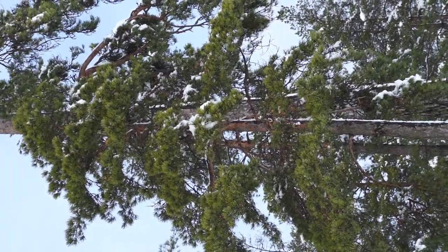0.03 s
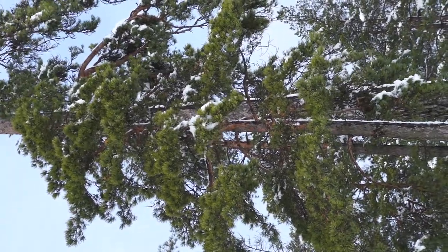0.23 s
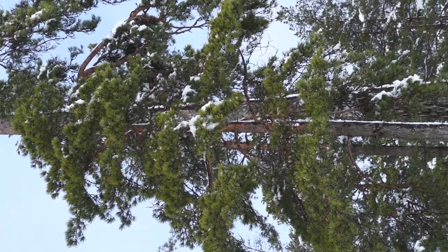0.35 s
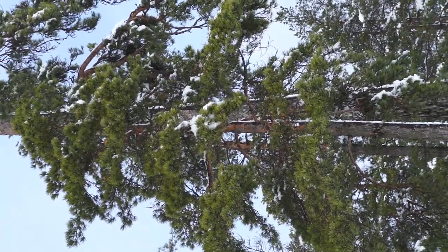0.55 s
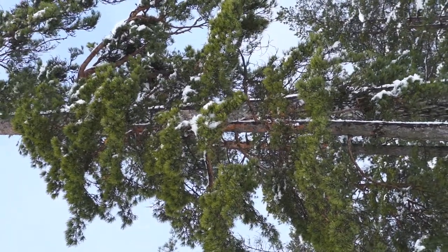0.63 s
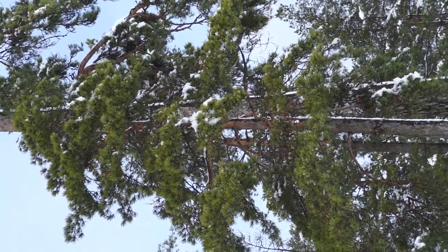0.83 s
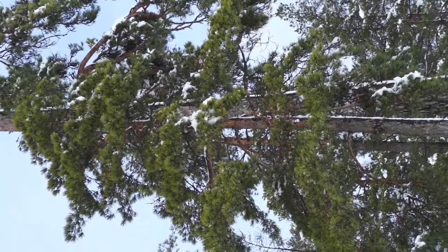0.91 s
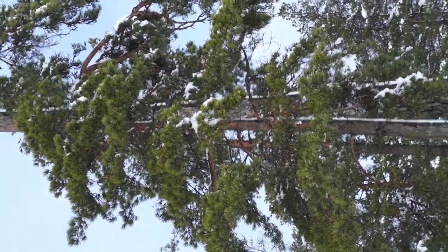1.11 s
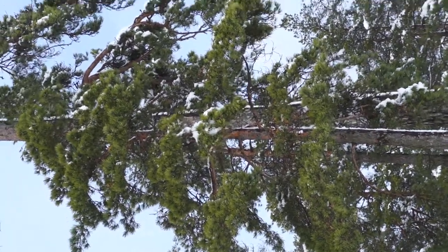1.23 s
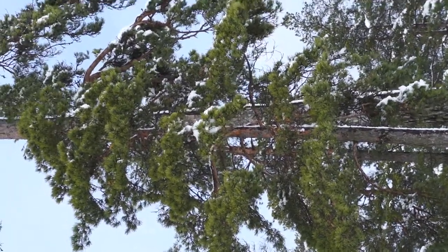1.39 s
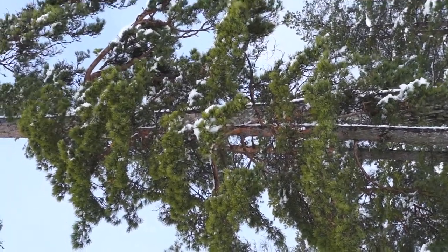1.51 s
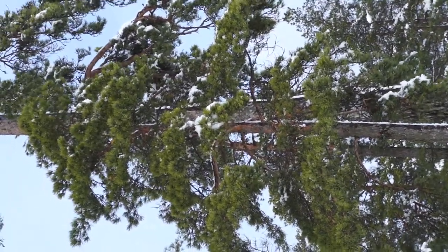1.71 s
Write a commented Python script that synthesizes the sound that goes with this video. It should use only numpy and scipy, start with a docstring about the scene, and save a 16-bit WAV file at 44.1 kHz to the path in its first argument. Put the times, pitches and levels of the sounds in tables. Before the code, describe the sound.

Wet snow falls from pine branches close by in a quick cluster of dull thuds, then a second cluster and scattered softer ones. Faint drips and a light rustle sound over the distant hush of a still wood.

```python
"""Thaw in a still pine wood

Wet snow gives way close by in clusters of dull thuds, with a low scuffing between them.
Drops and ice crumbs tick faintly and loose snow rustles now and then,
over a soft far-off wash and a thin steady whine."""
import sys
import numpy as np
from scipy import signal
from scipy.fft import rfft, irfft
from scipy.io import wavfile

SR = 44100
rng = np.random.default_rng(int(sys.argv[2]) if len(sys.argv) > 2 else 0)


def dump(signal):
    """Clip the signal to [-1, 1] and save it as 16-bit WAV at the path in sys.argv[1]."""
    limited = np.clip(np.atleast_2d(signal).T, -1, 1)
    pcm = np.round(limited * 32767).astype(np.int16)
    wavfile.write(sys.argv[1], SR, pcm)


N = 77175


def amp(db):
    """Decibels to gain."""
    return 10 ** (np.asarray(db) / 20)


def unit(x):
    """Scale to rms 1."""
    return x / np.sqrt(np.mean(x ** 2) + 1e-20)


def read(points, hz):
    """Interpolate a table on a log-frequency axis."""
    f, value = np.transpose(points)
    return np.interp(np.log(hz + 1), np.log(f + 1), value)


def curve(points):
    """Interpolate each column of a time table per sample."""
    times_s, *columns = np.transpose(points)
    return [np.interp(np.arange(N) / SR, times_s, column) for column in columns]


def pan(db):
    """Left and right gains for a level difference."""
    return amp(np.array([db, -db]).reshape(2, -1) / 2)


def colour(x, points):
    """Filter by a spectrum table, keeping the power of white noise."""
    size = x.shape[-1]
    gain = unit(amp(read(points, np.fft.rfftfreq(size, 1 / SR))))
    return irfft(rfft(x) * gain, size)


def add(mix, start_s, sound):
    """Mix in a stereo sound at start_s."""
    part = mix[:, max(round(start_s * SR), 0):][:, :sound.shape[1]]
    part += sound[:, :part.shape[1]]


def push(turns, half_cycles):
    """Soft push and rebound of air, dying within about a cycle."""
    return -np.sin(2 * np.pi * turns) * np.exp(-(turns / half_cycles) ** 2)


def thuds(core_ratio=1.58, crumble_db=-16.5, crumble_decay_s=0.0054):
    """Wet snow gives way: each thud is a push of air with a harder core and crumbling around it."""
    # thuds: t/s, level/dB, f/Hz, hardness/dB
    events = [(0.245, -29, 266, -7), (0.249, -22.5, 227, -15), (0.2561, -18, 290, -11.5),
              (0.2642, -18, 220, -18), (0.27, -25.5, 419, -15), (0.2749, -15, 443, -7.5),
              (0.2796, -15, 310, -10), (0.2891, -21, 350, -6), (0.3013, -17.5, 340, -21),
              (0.3032, -17.5, 486, -16.5), (0.314, -27, 267, -8), (0.3177, -19, 426, -9.5),
              (0.3254, -17, 238, -6.5), (0.332, -22, 249, -10), (0.3369, -21.5, 212, -14),
              (0.3736, -36, 149, -17), (0.58, -35, 217, -9), (0.833, -29, 197, -9.5),
              (0.8506, -37.5, 160, -17), (0.896, -32, 260, -22), (0.9692, -36, 252, -17),
              (1.0117, -24, 297, -8.5), (1.0162, -24, 382, -8), (1.0235, -18.5, 262, -17),
              (1.052, -30.5, 352, -17), (1.059, -36, 282, -1), (1.2574, -37.5, 158, -5),
              (1.2787, -38, 188, -3), (1.3773, -40.5, 187, -2), (1.4009, -34.5, 180, -17),
              (1.4108, -32, 274, -17), (1.418, -21, 271, -25), (1.4628, -23.5, 244, -4),
              (1.4685, -32, 216, -10), (1.735, -38, 272, -6)]
    # crumbling spectrum: f/Hz, density/dB
    crumble_spectrum = [(25, -37), (60, -23), (115, -8.5), (200, -8), (330, 3.5), (520, 5), (850, -6.5),
                        (1400, -27), (1750, -26), (3000, -59.5)]
    t, pulses, crumble_power = np.arange(N) / SR, np.zeros(N), np.zeros(N)
    for centre_s, db, hz, hard_db in events:
        turns = (t - centre_s) * hz
        core = amp(hard_db) * push(turns * core_ratio, half_cycles=0.53)
        pulses += amp(db) * (push(turns, half_cycles=0.62) + core)
        crumble_power += amp(db + crumble_db) ** 2 * np.exp(-2 * abs(t - centre_s) / crumble_decay_s)
    return pulses + colour(np.sqrt(crumble_power) * rng.standard_normal(N), crumble_spectrum)


def scuffing(spread_db=-16):
    """Low scuffing of snow between the thuds, nearly alike on both sides."""
    # envelope: t/s, level/dB
    envelope = [(0, -41.5), (.08, -42.5), (.13, -46), (.19, -45.5), (.33, -38), (.42, -56.5), (.58, -50.5),
                (.69, -54), (.77, -54.5), (.9, -45), (.98, -48.5), (1.05, -38), (1.14, -56), (1.19, -49),
                (1.27, -51), (1.34, -60.5), (1.51, -46.5), (1.57, -71), (1.75, -52.5)]
    # spectrum: f/Hz, density/dB
    spectrum = [(25, -33), (60, -13), (115, -3.5), (180, -1.5), (330, -10), (520, -13), (850, -30.5),
                (1400, -58), (3000, -62.5)]
    rub = rng.standard_normal(N) + amp(spread_db) * rng.standard_normal((2, N))
    return colour(amp(curve(envelope)[0]) * rub, spectrum)


def off_centre(snow):
    """The snow lies to one side, so its sound reaches the left channel later."""
    # channel differences: f/Hz, left lag/s, left-right/dB
    side = [(61, 0.00053, -0.5), (201, 0.00057, .5), (390, 0.00041, 0.8), (664, 0.00035, 3.5),
            (1100, 0.00018, 3)]
    side, hz = np.array(side), np.fft.rfftfreq(N, 1 / SR)
    delay_s = np.array([[.5], [-.5]]) * read(side[:, :2], hz)
    balance = pan(read(side[:, ::2], hz))
    return irfft(rfft(snow) * balance * np.exp(-2j * np.pi * hz * delay_s), N)


def ticks(decay_s=0.0029, ring_half_width_hz=230):
    """Drops and ice crumbs: each a tiny broadband splash with one short ring."""
    # impacts: t/s, level/dB, ring f/Hz, ring boost/dB, left-right/dB
    impacts = [(0.033, -49, 6100, 32, 4), (0.039, -51, 6100, 30, 16), (0.146, -54, 7900, 7, -2),
               (.442, -53, 8500, 14, -5), (0.542, -56.5, 8800, 17, -11), (.778, -49, 5160, 11, 0),
               (0.79, -54, 3630, 14, 5), (.8003, -48, 5500, 8, 0), (0.8082, -46.5, 8130, 1, -1),
               (0.8203, -47, 5900, 4, 1), (0.829, -47, 3670, 5, 0), (0.8405, -47, 3540, 15, 10),
               (.883, -48.5, 4100, 4, 2), (0.8865, -48, 3270, 19, -8), (0.94, -51, 10200, 3, 11),
               (0.946, -55, 8500, 1, -4), (1.028, -53, 8400, 20, -11), (1.0965, -52, 9500, 20, 5),
               (1.1076, -48.5, 9700, 15, 10), (1.11, -51.5, 3090, 20, 5), (1.162, -53, 8200, 22, -12),
               (1.313, -47, 10340, 26, 10), (1.316, -45, 3240, 10, 19), (1.4104, -48, 7550, 23, -19),
               (1.4195, -59, 9000, 15, 2), (1.454, -47, 8950, 7, -8)]
    # splash spectrum: f/Hz, density/dB
    spectrum = [(400, -8.5), (1500, 5.5), (3500, 5), (7000, 4.5), (11000, -1.5)]
    out, t = np.zeros((2, N)), np.arange(1024) / SR
    hz = np.fft.rfftfreq(len(t), 1 / SR)
    for start_s, db, ring_hz, ring_db, pan_db in impacts:
        boost_db = ring_db / (1 + ((hz - ring_hz) / ring_half_width_hz) ** 2)
        noise = rng.standard_normal((2, len(t))) + 0.82 * rng.standard_normal(len(t))
        splash = unit(irfft(rfft(noise) * amp(read(spectrum, hz) + boost_db)))
        add(out, start_s, amp(db) * pan(pan_db) * splash * np.exp(-t / decay_s) / 2)
    return out


def rustle(grain_db=3):
    """Loose snow sliding: a fine, grainy hiss that swells and fades."""
    # envelope: t/s, level/dB, left-right/dB
    envelope = [(0, -71.5, -2.5), (.72, -73.5, 1), (.82, -65.5, 1), (.93, -65, -2), (1.02, -72.5, 0),
                (1.15, -68.5, 2.5), (1.26, -62.5, 1), (1.315, -56.5, -3), (1.345, -67, 1),
                (1.39, -66.5, -3), (1.412, -58.5, -5), (1.45, -61, -3), (1.49, -65.5, -1), (1.64, -65, 0),
                (1.71, -61, 2), (1.75, -64, -3)]
    # spectrum: f/Hz, density/dB
    spectrum = [(500, -20), (1800, 2.5), (3200, 0.5), (3650, 6), (4000, 0.5), (5800, -0.5), (7000, 2),
                (7350, 5), (7750, -0.5), (9500, -2.5), (10300, 1), (11000, -9.5)]
    db, pan_db = curve(envelope)
    grains = unit(rng.standard_normal((2, N)) * amp(grain_db * rng.standard_normal(N)))
    return amp(db) * pan(pan_db) * colour(grains, spectrum)


def wash(level_db=-54):
    """Far-off wash of the wood: smooth noise, partly shared by the two sides."""
    # spectrum: f/Hz, density/dB
    spectrum = [(20, -18), (60, -6.5), (130, -6.5), (350, -8), (580, -3.5), (660, -4.5), (730, 1.5),
                (820, -5.5), (930, -4.5), (1040, -3), (1160, 2.5), (1250, -5), (1380, -13.5), (1800, -15),
                (2000, -17.5), (2170, -15), (2700, -22.5), (4000, -26.5), (4700, -21.5), (5300, -27.5),
                (6400, -26), (6800, -15.5), (7250, -28), (8500, -25), (11000, -36.5)]
    # likeness of the sides: f/Hz, correlation/0-1
    correlation = [(60, 0.9), (270, 0.48), (560, 0.8), (1180, 0.73), (2500, 0.62), (5250, 0.61),
                   (11000, 0.21)]
    # balance: f/Hz, left-right/dB
    balance = [(100, 3.5), (400, 1), (1100, -3.5), (2000, -4), (3500, 0), (6200, 3), (11000, -2.5)]
    hz = np.fft.rfftfreq(N, 1 / SR)
    left, independent = rfft(rng.standard_normal((2, N)))
    shared = np.clip(read(correlation, hz), 0, 1)
    right = shared * left + np.sqrt(1 - shared ** 2) * independent
    pair = np.array([left, right]) * pan(read(balance, hz))
    return amp(level_db) * colour(irfft(pair, N), spectrum)


def whine(waver_db=3.8, waver_corner_hz=3):
    """Two faint high tones of steady pitch that swell, fade and waver in level."""
    # tones: f/Hz, base level/dB
    partials = [(4738, -69), (4682, -79.5)]
    # envelope: t/s, gain/dB, left-right/dB
    envelope = [(0, -5.5, -15), (.13, -6.5, -14), (.28, -2.5, -16), (.45, -8.5, -17.5), (.73, -2, -4.5),
                (.9, -11.5, -16), (1.02, -6.5, -18), (1.12, -9, -3), (1.21, 5, -3), (1.35, -6.5, -11),
                (1.52, -5, -6), (1.62, -10, -14), (1.74, 5, -8)]
    t, hz = np.arange(N) / SR, np.fft.rfftfreq(N, 1 / SR)
    gain_db, pan_db = curve(envelope)
    waver = unit(irfft(rfft(rng.standard_normal((2, N))) / (1 + hz / waver_corner_hz), N))
    tones = sum(amp(db) * np.sqrt(2) * np.sin(2 * np.pi * (f * t + rng.random())) for f, db in partials)
    return pan(pan_db) * amp(gain_db + waver_db * waver) * tones


def scene():
    """Snow and drops in front of the quiet wood."""
    return off_centre(thuds() + scuffing()) + ticks() + rustle() + wash() + whine()


def record(dry):
    """Low-pass at 11.1 kHz."""
    lowpass = signal.firwin(511, 11100, window=("kaiser", 9), fs=SR)
    return signal.oaconvolve(dry, lowpass[None], "same")


dry = scene()
out = record(dry)
dump(out)
```